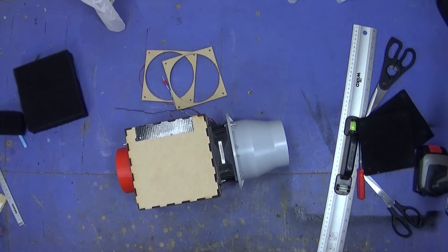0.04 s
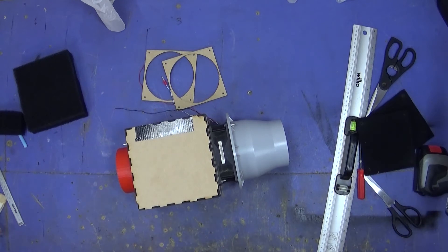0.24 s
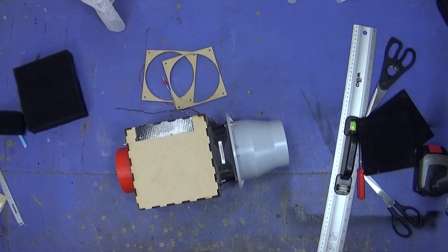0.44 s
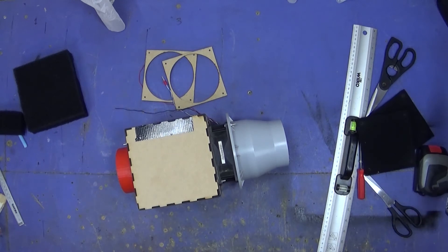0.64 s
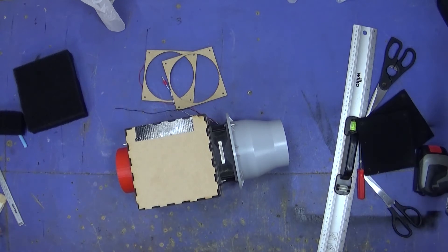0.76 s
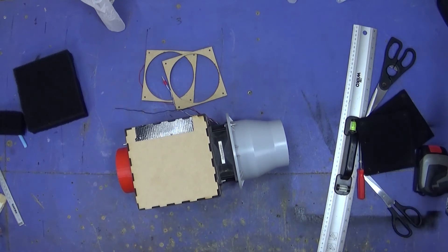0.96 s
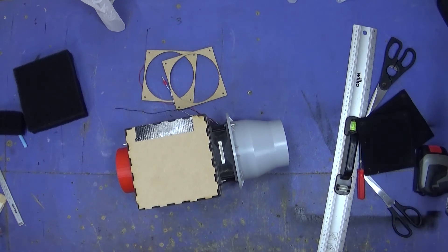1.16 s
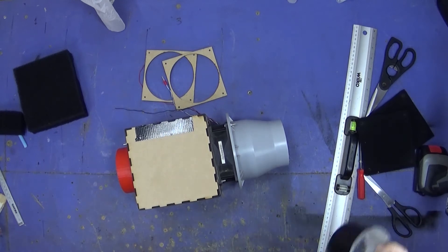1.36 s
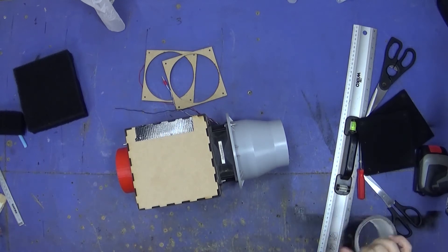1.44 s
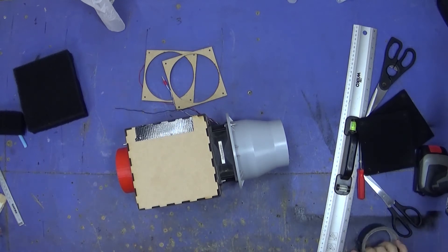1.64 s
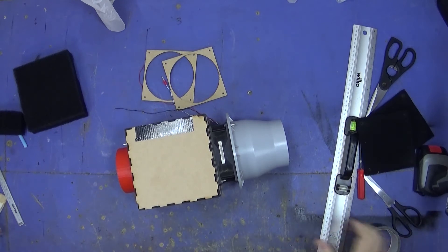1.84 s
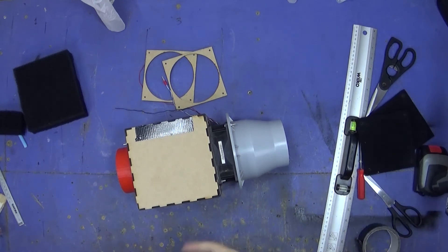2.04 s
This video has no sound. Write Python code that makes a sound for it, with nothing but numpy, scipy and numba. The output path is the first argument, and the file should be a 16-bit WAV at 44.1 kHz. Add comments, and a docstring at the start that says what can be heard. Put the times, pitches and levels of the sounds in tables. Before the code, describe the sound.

Close and dry: a quick, harsh tape tear, soft handling and sliding fingers, a few ticks and another brief tear, then a hard wooden knock with rattle as the roll is set down, over quiet room air and light hiss.

```python
"""Cloth tape in a small workshop, as noise and impulses driving resonances over quiet air and hiss.
It is picked at and rubbed with small crackles, then torn, and the hollow core jolts in the hand.
Fingers slide over the roll; a nail picks at the taut edge and the tape is torn a second time.
The roll cracks and rattles as it lands on a wooden bench, whose modes ring; a faint blow follows.
Throughout, the bench top mirrors each sound and the room answers with decaying noise."""
import sys
import numpy as np
from scipy import signal
from scipy.fft import rfft, irfft
from scipy.io import wavfile
from scipy.ndimage import uniform_filter1d
from numba import njit

SR = 44100
rng = np.random.default_rng(int(sys.argv[2]) if len(sys.argv) > 2 else 0)


def level_to_linear(level):
    """Convert decibel levels to linear amplitude factors, elementwise."""
    exponent = np.asarray(level, float) / 20
    return 10 ** exponent


def transcribe(signal):
    """Save signal, clipped to [-1, 1], as a 16-bit WAV file at the path in sys.argv[1]."""
    frames = np.atleast_2d(signal).T
    limited = np.clip(frames, -1, 1)
    pcm = np.round(limited * 32767).astype(np.int16)
    wavfile.write(sys.argv[1], SR, pcm)


N = 92610  # samples, 2.1 s


def at_hz(table, hz):
    """Interpolation on a logarithmic frequency axis: reads a (frequency, value) table."""
    table = np.array(table)
    return np.interp(np.log(np.maximum(hz, 1)), np.log(table[:, 0]), table[:, 1])


def ring(x, hz, width):
    """Resonance: a second-order peak with Q = hz / width and gain 1 at its centre."""
    return signal.lfilter(*signal.iirpeak(hz, hz / width, SR), x)


def ring_twice(x, hz, width):
    """Cascaded resonance: two equal peaks in series fall off more steeply."""
    return ring(ring(x, hz, width), hz, width)


def tint(x, table):
    """Spectral weighting: colours a sound by a (frequency, level) table."""
    n = x.shape[-1]
    return irfft(rfft(x) * level_to_linear(at_hz(table, np.fft.rfftfreq(n, 1 / SR))), n)


def walk(rate):
    """Random modulation: levels held 1 / rate s and slewed."""
    hold = int(SR / rate)
    levels = np.repeat(rng.standard_normal(N // hold + 1), hold)
    return uniform_filter1d(levels, hold)[:N]


def burst(x):
    """Windowed noise: a short piece at unit level under a rounded window."""
    x = x * np.sqrt(np.hanning(len(x)))
    return x / x.std()


# side weighting of everything distant: (frequency [Hz], level [dB])
SIDE_WIDTH = [(60, -16.5), (500, -8.5), (1500, -7.5), (4000, -7.5), (9000, -12.5), (15000, -17.5)]


def pair(mid, side):
    """Mid/side stereophony: left and right are the sum and difference of mid and weighted side."""
    side = tint(side, SIDE_WIDTH)
    return np.array([mid + side, mid - side])


# spectrum of air and hiss: (frequency [Hz], relative level per Hz [dB])
FLOOR_SPECTRUM = [(12, -31), (25, -5.5), (60, -6), (150, -6), (300, -1.5), (450, -6.5), (1000, -12.5),
                  (2500, -16.5), (5000, -19), (9000, -20.5), (16000, -25)]
FLOOR_DB, FLOOR_FLICKER_DB = -62, 2.0  # rms of the mid; spread of its wandering level


def floor():
    """Stationary noise, slowly modulated: quiet workshop air and microphone hiss."""
    noise = tint(rng.standard_normal((2, N)), FLOOR_SPECTRUM)
    mid, side = noise * level_to_linear(FLOOR_FLICKER_DB * walk(9.95))
    return pair(mid, side) / mid.std() * level_to_linear(FLOOR_DB)


# small crackles of the tape, and the crack and rattle of the roll as it lands on the bench:
# (time [s], length [s], relative drive [dB] of the top, middle, low and body ring)
CRACKLE_EVENTS = [(0.0118, .002, -73, -80, -53, -44.5), (0.0219, 0.0018, -54.5, -47, -48, -52),
                  (.065, 0.0028, -56, -58.5, -71, -52), (0.22, 0.019, -57.5, -65, -58, -69),
                  (0.121, 0.0048, -49.5, -47, -60.5, -48), (0.1225, 0.0079, -39.5, -38.5, -35.5, -41),
                  (.48, 0.00308, -48.5, -53, -49.5, -55), (.608, 0.0039, -69, -69, -66, -61),
                  (0.654, 0.052, -57.5, -59, -57.5, -55.5), (0.6757, 0.0063, -37, -41.5, -32, -36),
                  (0.706, 0.0045, -66, -65, -66, -64), (1.012, 0.0059, -66, -70.5, -58.5, -64),
                  (1.0615, 0.0019, -32.5, -58.5, -38, -53.5), (1.0905, 0.0018, -68.5, -43.5, -43, -37.5),
                  (1.1142, .001, -37.5, -52, -61, -61), (1.141, 0.0023, -60, -54.5, -57.5, -59),
                  (1.1853, 0.00069, -26.5, -37.5, -43, -45), (1.199, .001, -22, -29, -32, -36),
                  (1.633, 0.0091, -35.5, -49, -65, -18), (1.674, 0.0024, -55, -36.5, -42.5, -45),
                  (1.783, 0.015, -69.5, -63.5, -73, -64)]
# strokes of tearing, threads snap in a row:
# (time [s], length [s], relative drive [dB] of the top, middle, low and body ring)
TEAR_STROKES = [(0.2418, .030, -4, -3.5, -7.5, -13.5), (0.276, 0.012, 4.5, -1, -12, -12),
                (0.2923, 0.023, -2, -11.5, -8, -19), (0.3181, .012, 2, -6.5, -10.5, -12),
                (0.3351, 0.0074, -5, -7.5, -7.5, -12.5), (1.2021, 0.017, -9, -7.5, -9.5, -26),
                (1.2161, 0.0094, -3.5, -5, -24, -19.5), (1.2286, .022, 0.5, -8, -13.5, -14)]
# rings of the tape and roll: (frequency [Hz], width [Hz])
TAPE_RINGS = [(8535, 3260), (4140, 3400), (2480, 1350), (1050, 1740)]
THREADS_PER_S, THREAD_JITTER, THREAD_SPREAD_DB = 380, .2, 0.5  # jitter: log spread of the gaps
FIBRES_PER_S, FIBRE_DB, FIBRE_SPREAD_DB = 8000, -6, 4.5
SNAP_DB, SNAP_S, AIR_DB = 5, 0.00066, -12  # gain and fading time of a snap; gain of its top ring
AIR_HZ, AIR_WIDTH_HZ = 11960, 4430
STROKE_RISE_S, STROKE_END = 0.0034, .35  # end: share of the pull left
CRACKLE_DB = 9.5  # how hard a crackle drives the rings


def thread_snaps(n):
    """Near-periodic impulse train: threads snap in a nearly even row over n samples."""
    chance = rng.standard_normal((30, 2))
    gaps = np.exp(THREAD_JITTER * chance[1:, 0]) / THREADS_PER_S
    times = np.r_[0, np.cumsum(gaps)]
    keep = times < n / SR
    snaps = np.zeros(n)
    places = (times[keep] * SR).astype(int).clip(0, n - 1)
    snaps[places] = level_to_linear(SNAP_DB + THREAD_SPREAD_DB * chance[keep, 1])
    return snaps


def tape_and_roll():
    """Impulsive excitation of resonances: fibres and threads in a tear, noise bursts in a crackle."""
    fibres = (rng.random(N) < FIBRES_PER_S / SR) * rng.standard_normal(N)
    fibres = fibres * level_to_linear(FIBRE_SPREAD_DB * rng.exponential(1, N))
    fibres = fibres / fibres.std()
    drive, hiss = np.zeros((4, N)), rng.standard_normal(N)
    fade = np.exp(-np.arange(256) / SR / SNAP_S)
    for t0, length, *dbs in TEAR_STROKES:
        i, n = int(t0 * SR), int(length * SR)
        snaps = thread_snaps(n)
        snap_noise = np.convolve(snaps, fade)[:n] * hiss[i:i + n]
        stroke = level_to_linear(FIBRE_DB) * fibres[i:i + n] + snap_noise - snaps
        rise = np.minimum(1, .5 + np.arange(n) / SR / STROKE_RISE_S / 2)  # starts at half pull
        fall = 1 - (1 - STROKE_END) * np.linspace(0, 1, n) ** 4
        drive[:, i:i + n] += level_to_linear(np.array(dbs))[:, None] * stroke * rise * fall
    for t0, length, *dbs in CRACKLE_EVENTS:
        i, n = int(t0 * SR), int(length * SR) + 3
        crackle = burst((hiss + fibres)[i:i + n])
        drive[:, i:i + n] += level_to_linear(np.array(dbs) + CRACKLE_DB)[:, None] * crackle
    out = -level_to_linear(AIR_DB) * ring_twice(drive[0], AIR_HZ, AIR_WIDTH_HZ)
    for k, (hz, width) in enumerate(TAPE_RINGS):
        out = out + (-1) ** k * ring_twice(drive[k], hz, width)  # neighbours in opposite phase
    return out


# fingers slide on the tape: (time [s], rms level [dB])
SLIDE_LEVEL = [(0, -83), (.06, -65), (.11, -57), (.2, -92.5), (.24, -73), (0.659, -115), (.72, -62),
               (.82, -57.5), (.92, -64.5), (1.02, -69), (1.2, -82), (1.3, -89)]
# hollow of the roll under the fingers: (frequency [Hz], width [Hz], relative level [dB])
ROLL_HOLLOWS = [(306, 13, 1.5), (813, 51, -4.5), (1220, 72, -4), (2150, 600, 2.5), (4890, 400, -2.5),
                (7000, 930, -8), (8330, 4000, -32)]


def fingers():
    """Source and filter: a rough rub of noise heard through the hollows of the roll."""
    rub = rng.standard_normal(N) * level_to_linear(1.0 * walk(91))
    out = np.zeros(N)
    for hz, width, db in ROLL_HOLLOWS:
        out += level_to_linear(db) * ring(rub, hz, width) / np.sqrt(width / SR)  # power independent of width
    level = np.interp(np.arange(N) / SR, *np.array(SLIDE_LEVEL).T)
    return out / out.std() * level_to_linear(level)


# the hollow core of the roll jolts in the hand: (time [s], level [dB])
CORE_JOLTS = [(.256, -20), (.264, -17.5)]
CORE_HZ, CORE_T60_S, CORE_RISE_S = 316.5, 0.064, 0.0051


def core():
    """Damped oscillation with a gradual onset: a soft, low, hollow bump."""
    t, out = np.arange(SR // 5) / SR, np.zeros(N)
    bump = np.sin(2 * np.pi * CORE_HZ * t) * (1 - np.exp(-t / CORE_RISE_S))
    bump = bump * 1000. ** (-t / CORE_T60_S)
    for t0, db in CORE_JOLTS:
        i = int(t0 * SR)
        out[i:i + len(t)] += level_to_linear(db) * bump
    return out


# blows on the bench: (time [s], relative level [dB], contact [s])
BENCH_BLOWS = [(.678, -33.5, 0.00098), (1.6335, 0.5, 0.00049), (1.6422, -8, 0.00061), (1.672, -12, 0.00067),
               (2.092, -46, 0.0013)]
# bench modes: (frequency [Hz], relative level [dB], 60 dB decay time [s])
BENCH_MODES = [(51.5, -10.5, 0.29), (75, -5.5, .3), (149.5, -10, .18), (170, -5, 0.11), (242, -15, 0.26),
               (288.3, -7.5, .1), (332.7, 0, 0.084), (401, -3.5, .06), (480, -8, 0.041), (503, 4, 0.046),
               (615, 2, 0.024), (812, 7.5, 0.017), (960, 3, 0.018), (1244, -2.5, 0.017), (1380, -18, 0.036)]
BENCH_LOW_HZ = 152  # the top radiates little below this


def bench():
    """Modal superposition: a short push excites damped modes, a little differently at each blow."""
    t, out = np.arange(SR // 2) / SR, np.zeros(N + SR)
    hz, db, t60 = np.array(BENCH_MODES).T[:, :, None]
    for t0, blow_db, contact in BENCH_BLOWS:
        strength = level_to_linear(db + 2.0 * rng.standard_normal(hz.shape))
        modes = strength * np.sin(2 * np.pi * hz * t) * 1000. ** (-t / t60)
        push = np.hanning(int(contact * SR) + 3)
        sound = signal.fftconvolve(modes.sum(axis=0), push / push.sum())
        i = int(t0 * SR)
        out[i:i + len(sound)] -= level_to_linear(blow_db) * sound / 4
    radiation = signal.butter(2, BENCH_LOW_HZ, "high", fs=SR, output="sos")
    return signal.sosfilt(radiation, out[:N])


# a fingernail picks at the taut tape edge:
# (time [s], length [s], relative drive [dB] of the high and low ring)
NAIL_PICKS = [(1.0607, .0015, -25.5, -21.5), (1.0905, .001, -52, -13), (1.1142, .001, -23, -41),
              (1.143, .001, -56, -40.5), (1.160, .002, -37.5, -51), (1.1828, .001, -10.5, -13),
              (1.1849, .002, -5, -2.5)]
# rings of the taut edge: (frequency [Hz], width [Hz])
EDGE_RINGS = [(8870, 3000), (2370, 680)]


def picks():
    """Resonance under short excitation: ticks of noise in the two rings of the stretched edge."""
    out = 0
    for k, (hz, width) in enumerate(EDGE_RINGS):
        drive = np.zeros(N)
        for t0, length, *dbs in NAIL_PICKS:
            i, n = int(t0 * SR), int(length * SR) + 3
            drive[i:i + n] += level_to_linear(dbs[k]) * burst(rng.standard_normal(n)) / 2
        out = out + ring_twice(drive, hz, width) + level_to_linear(-13) * ring(drive, hz, 2.0 * width)
    return out


# room decay: (frequency [Hz], 60 dB decay time [s])
ROOM_DECAY = [(60, 0.46), (250, 0.2122), (1000, 0.2863), (4000, 0.37), (9000, 0.2433), (15000, 0.3025)]
# room colour: (frequency [Hz], relative level [dB])
ROOM_SPECTRUM = [(60, 10), (300, 7), (1000, 10.5), (3000, 1), (9000, 7), (15000, -2)]
MIRROR_S, MIRROR_DB, MIRROR_SIDE_DB = .0031, -6.5, -14  # side before its weighting
ROOM_DB, ROOM_RISE_S, ROOM_HOLD_S = -18, 0.002, 0.0089  # relative level
NEAR_DB, NEAR_T60_S = -8.5, .04  # quick scatter from things on the bench, relative level


def room(x):
    """Image source and diffuse decay: one bench reflection, and a wash whose bands die at own rates."""
    t, wash = np.arange(int(.7 * SR)) / SR, 0
    for hz in 45 * 2 ** np.arange(0, 8.6, .5):  # half-octave steps
        band = ring(rng.standard_normal((2, len(t))), hz, hz / 2.5)
        fade = 1000. ** (-np.maximum(t - ROOM_HOLD_S, 0) / at_hz(ROOM_DECAY, hz))
        fade = fade + level_to_linear(NEAR_DB - ROOM_DB) * 1000. ** (-t / NEAR_T60_S)
        wash = wash + band * fade * level_to_linear(at_hz(ROOM_SPECTRUM, hz))
    rise = 1 - np.exp(-t / ROOM_RISE_S)
    wash = pair(wash[0], wash[1]) * rise * level_to_linear(ROOM_DB) / np.sqrt(SR / 100)
    lag = int(MIRROR_S * SR)
    mirror = level_to_linear(MIRROR_DB) * np.r_[np.zeros(lag), x[:-lag]]
    mirror_side = level_to_linear(MIRROR_SIDE_DB) * tint(mirror, SIDE_WIDTH)
    mirror = mirror + mirror_side * np.array([[1], [-1]])
    return x + mirror + signal.fftconvolve(x[None], wash, axes=1)[:, :N]


def scene():
    """Linear superposition: tape, roll, fingers and bench in the room, over the noise floor."""
    return room(tape_and_roll() + fingers() + core() + bench() + picks()) + floor()


@njit
def follow(x, up, down):
    """Envelope detection: one-pole smoothing that rises fast and falls slowly."""
    out, e = np.empty(len(x)), 1e-6
    for i in range(len(x)):
        e += (x[i] - e) * (up if x[i] > e else down)
        out[i] = e
    return out


def band_limit(x):
    """A steep low-pass at the top of the band."""
    return signal.sosfilt(signal.butter(12, 16820, fs=SR, output="sos"), x)


LIMIT_DB, LIMIT_RATIO, ATTACK_S, RELEASE_S = -15, 4.73, 0.0012, 0.024
CEILING, LOW_CUT_HZ, TOP_HZ = 0.81, 23, 16200


def record(dry):
    """Dynamic compression, saturation and band limiting: loud moments dip, peaks are rounded."""
    env = follow(np.abs(dry).max(axis=0), 1 / (ATTACK_S * SR), 1 / (RELEASE_S * SR))
    gain = np.minimum(1, level_to_linear(LIMIT_DB) / env) ** (1 - 1 / LIMIT_RATIO)
    ahead = 66  # samples by which the gain leads the sound
    gain = np.r_[gain[ahead:], np.ones(ahead)]
    rounded = CEILING * np.tanh(dry * gain / CEILING)
    top_cut = signal.ellip(8, .2, 60, TOP_HZ, fs=SR, output="sos")
    low_cut = signal.butter(2, LOW_CUT_HZ, "high", fs=SR, output="sos")
    mix = signal.sosfilt(low_cut, signal.sosfilt(top_cut, rounded))
    return band_limit(mix)


dry = scene()
out = record(dry)
transcribe(out)
```